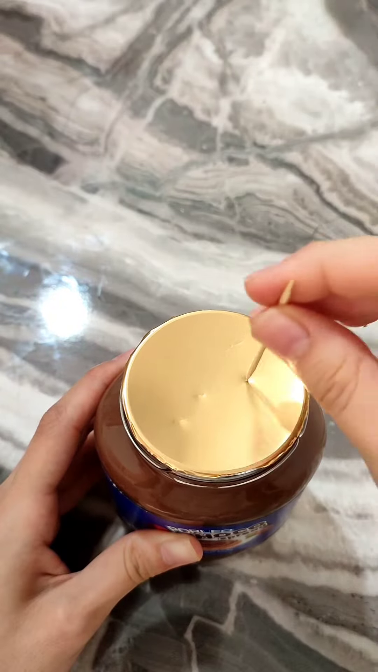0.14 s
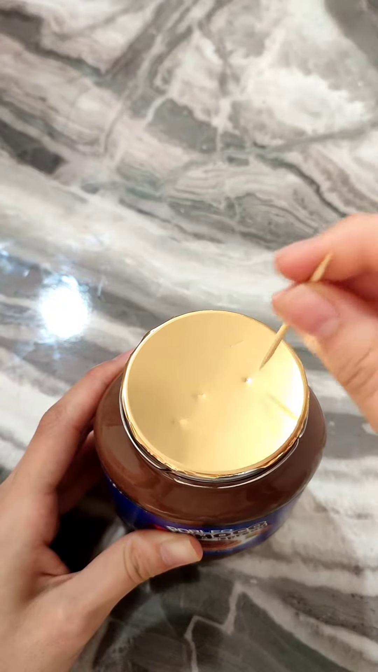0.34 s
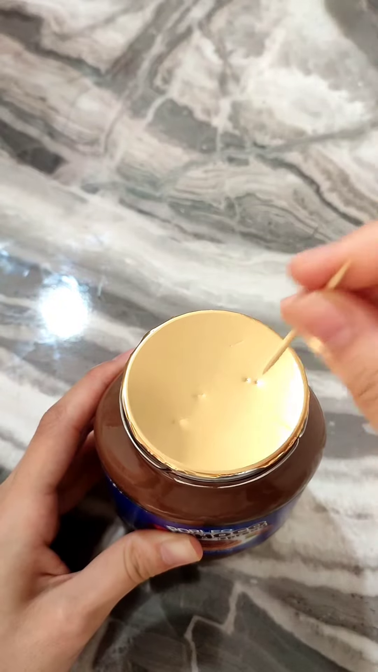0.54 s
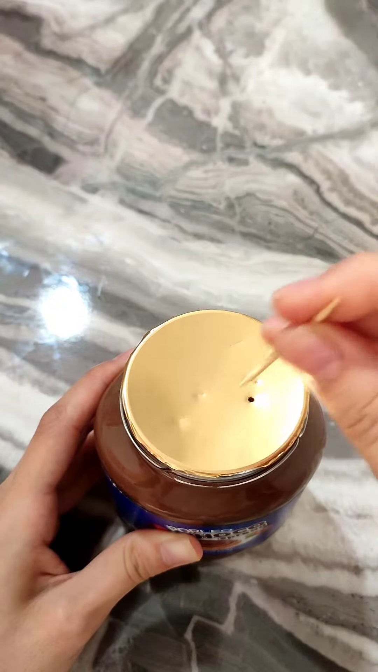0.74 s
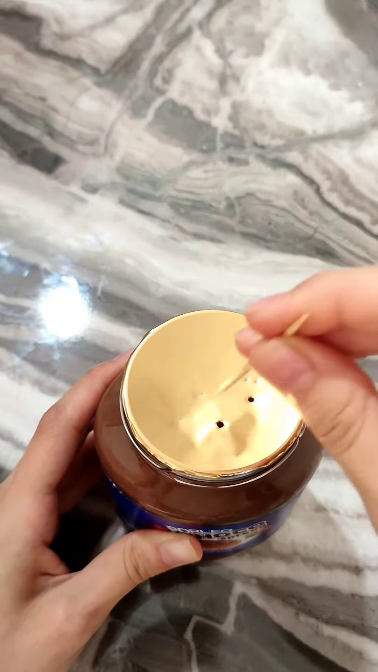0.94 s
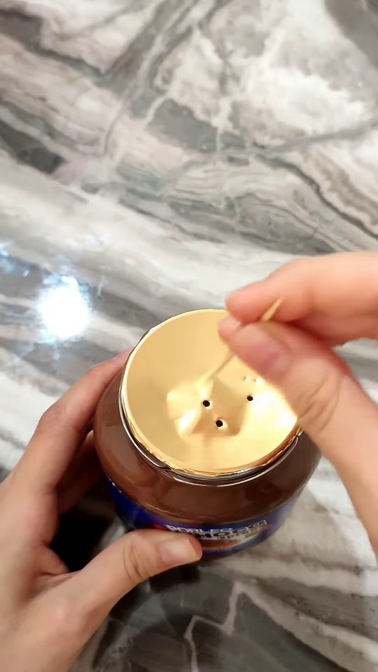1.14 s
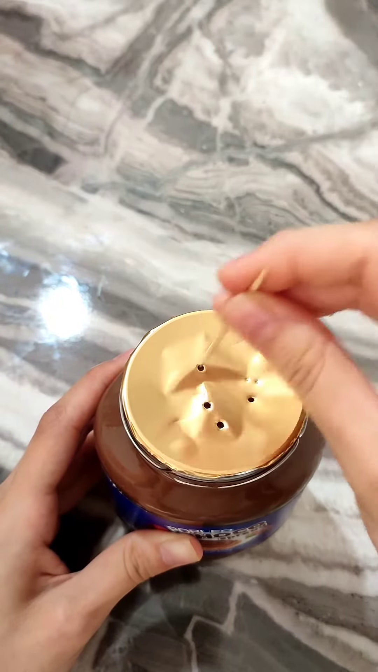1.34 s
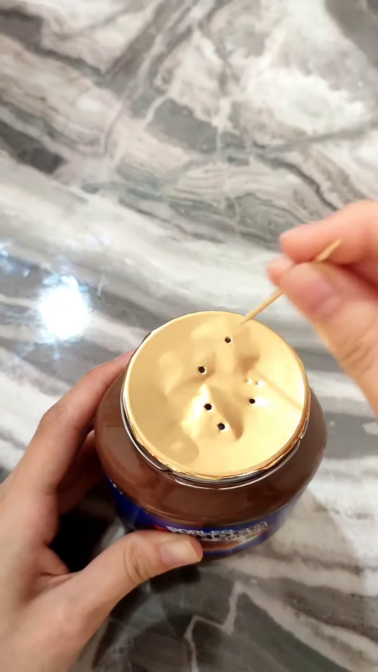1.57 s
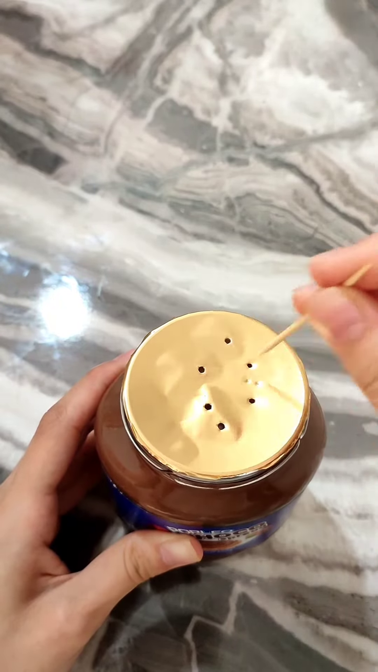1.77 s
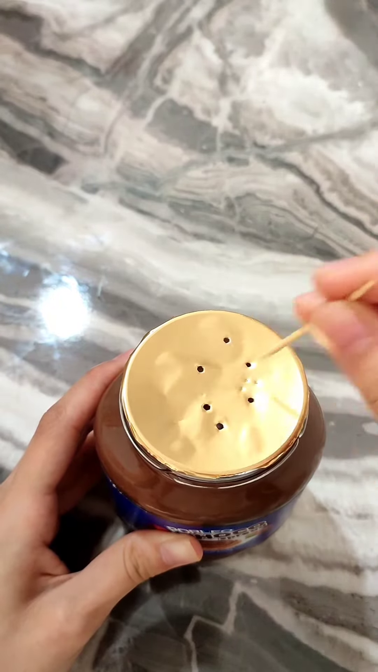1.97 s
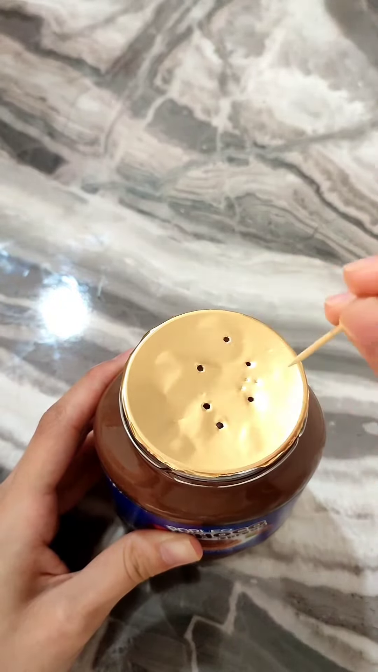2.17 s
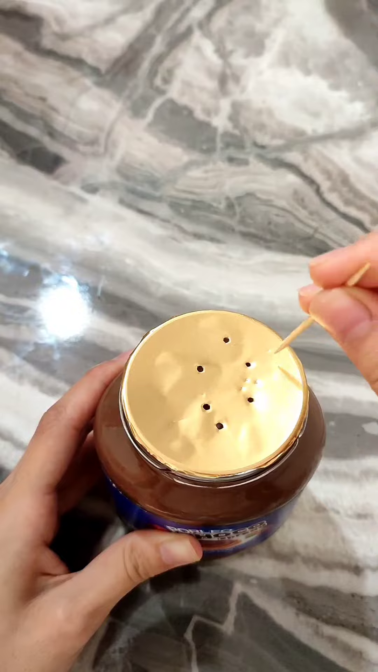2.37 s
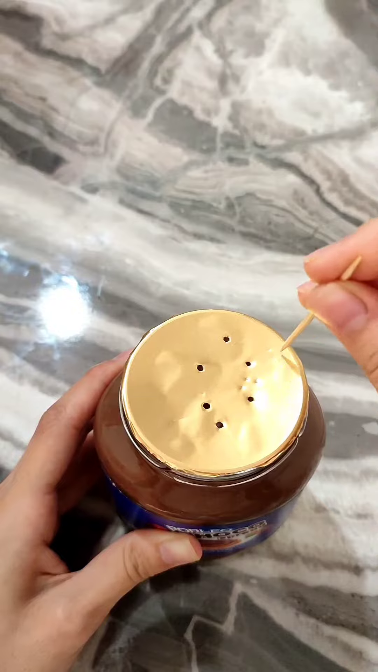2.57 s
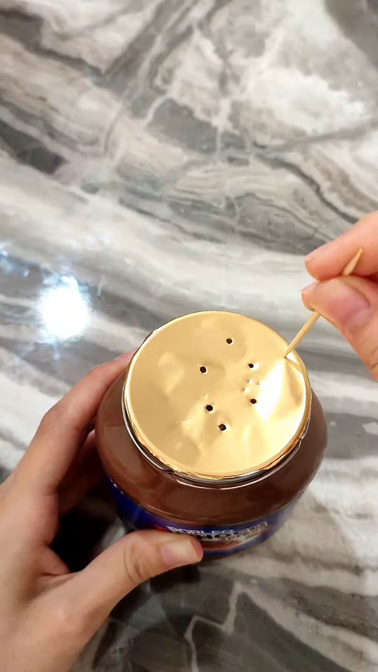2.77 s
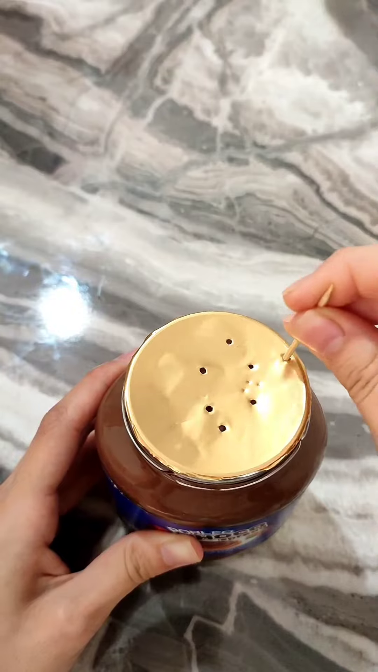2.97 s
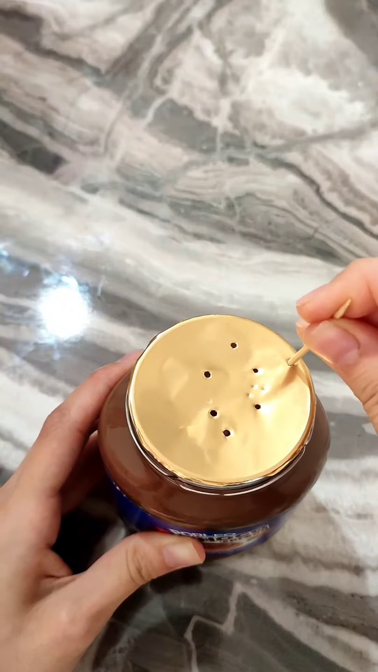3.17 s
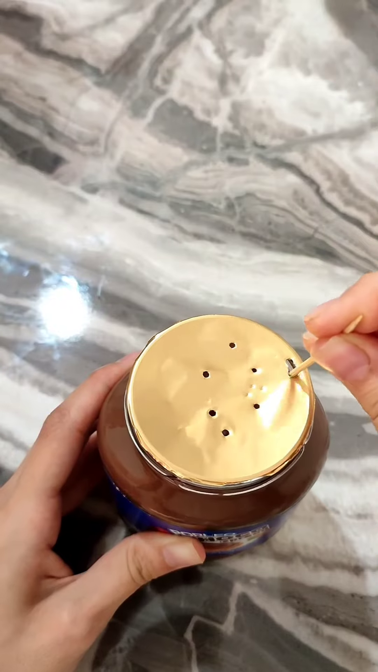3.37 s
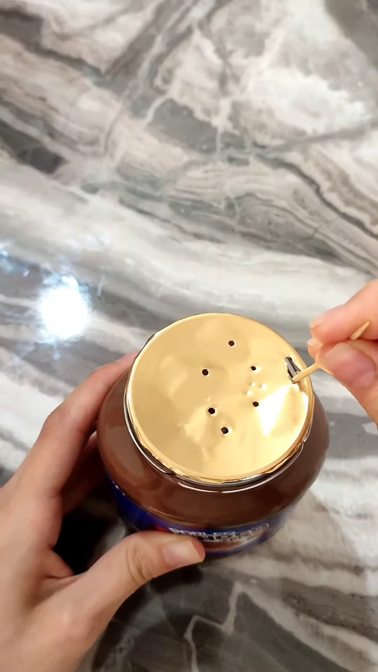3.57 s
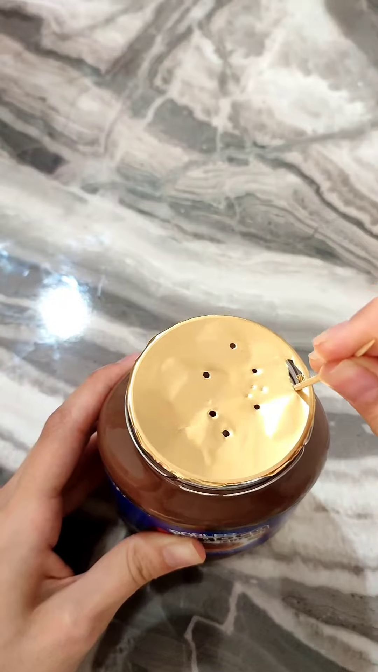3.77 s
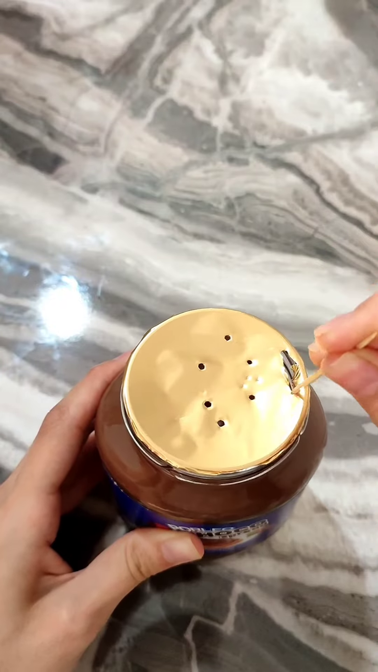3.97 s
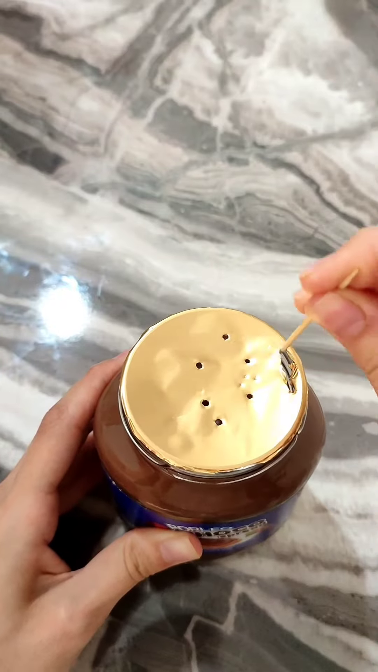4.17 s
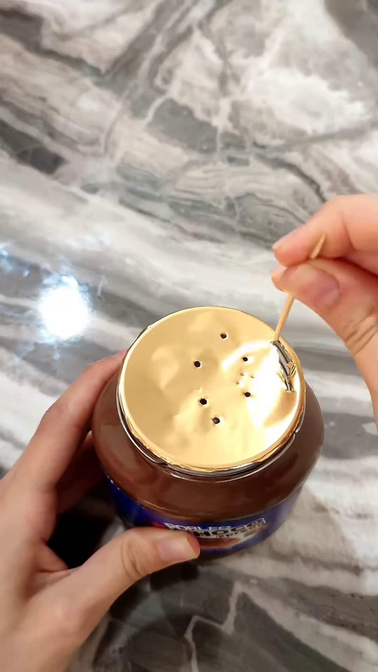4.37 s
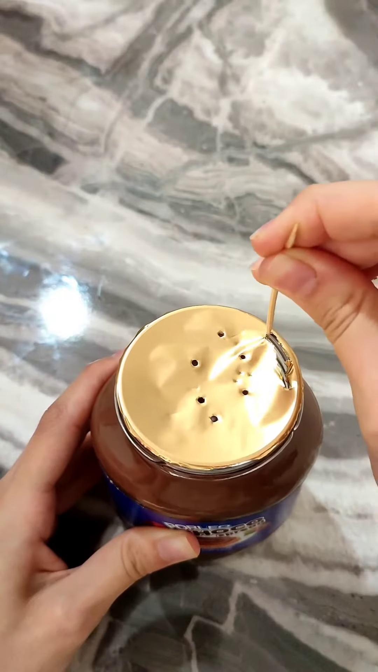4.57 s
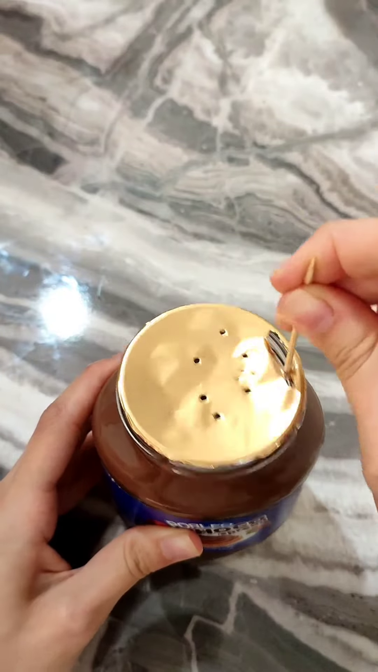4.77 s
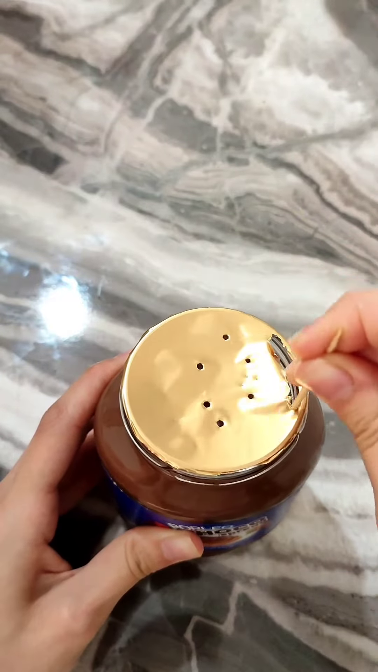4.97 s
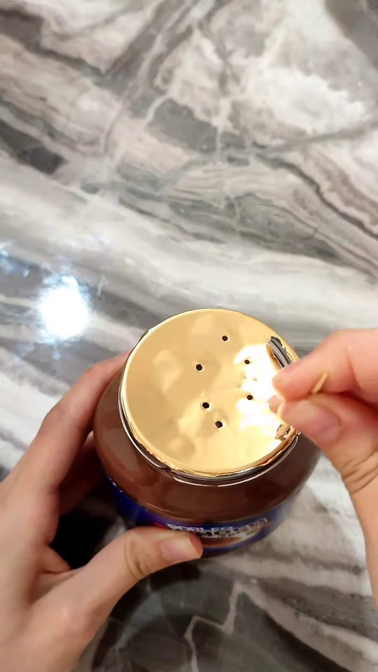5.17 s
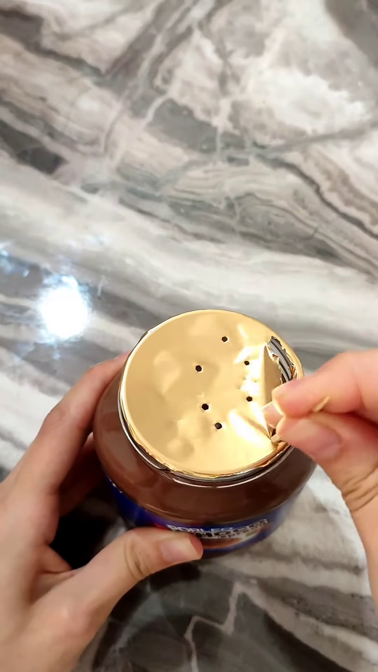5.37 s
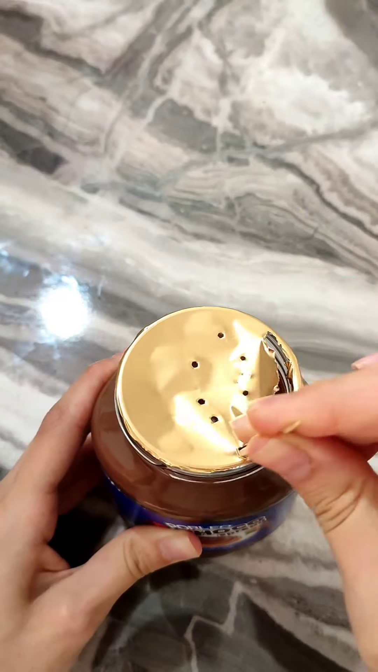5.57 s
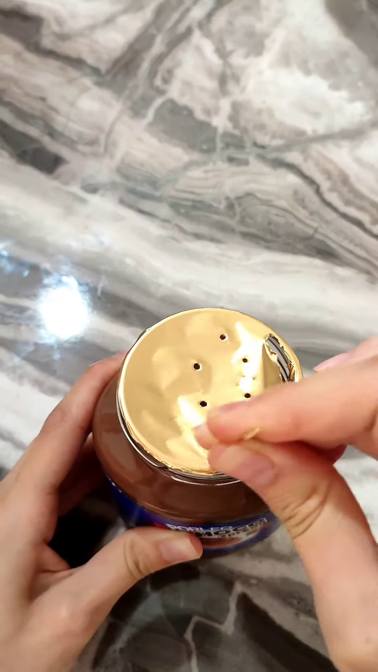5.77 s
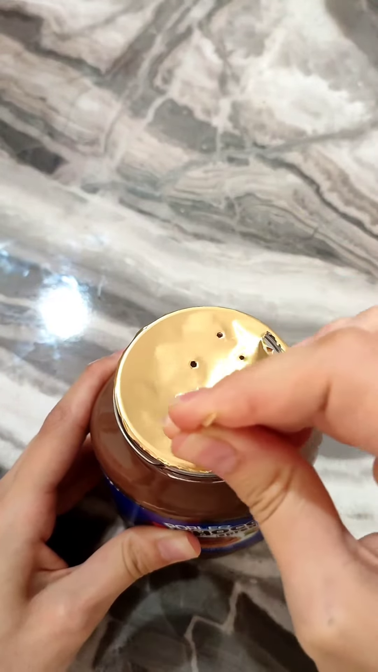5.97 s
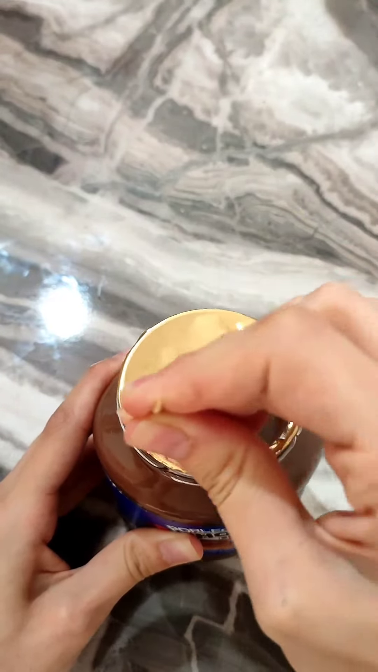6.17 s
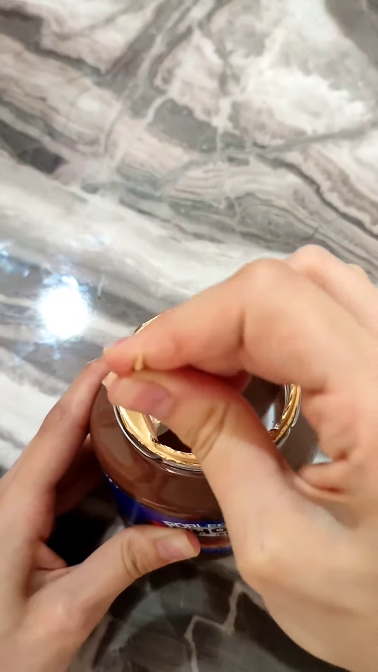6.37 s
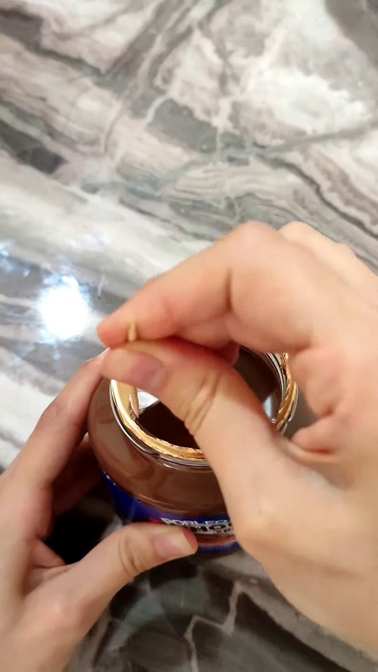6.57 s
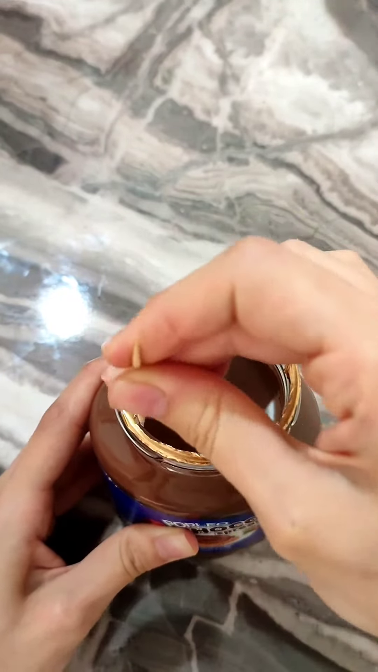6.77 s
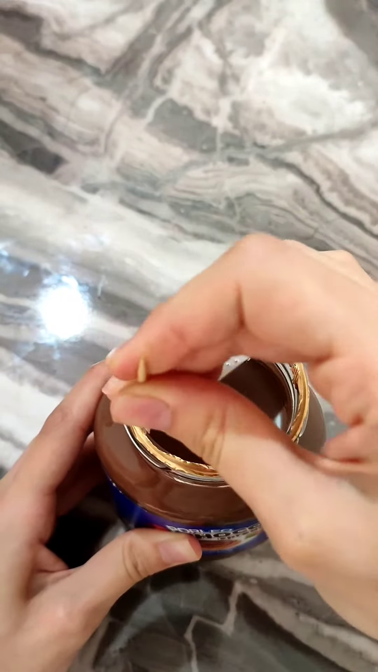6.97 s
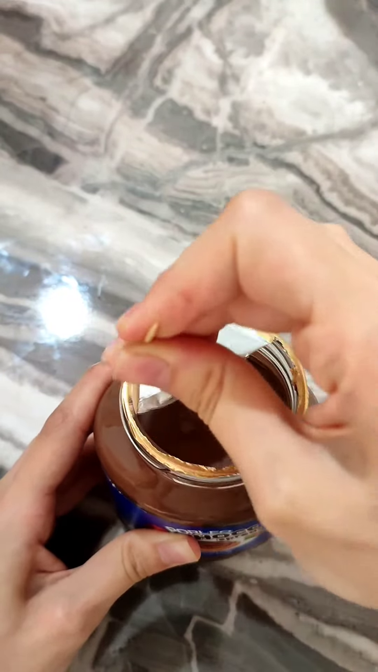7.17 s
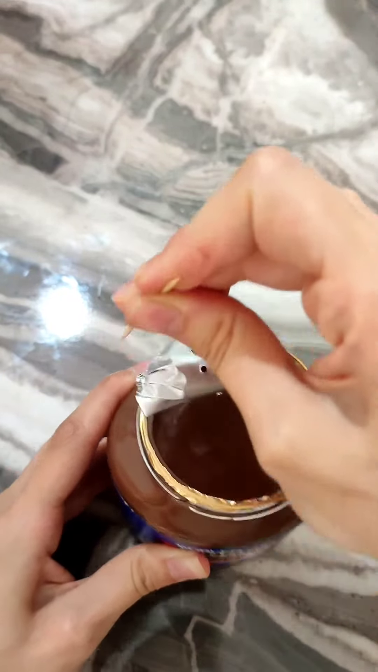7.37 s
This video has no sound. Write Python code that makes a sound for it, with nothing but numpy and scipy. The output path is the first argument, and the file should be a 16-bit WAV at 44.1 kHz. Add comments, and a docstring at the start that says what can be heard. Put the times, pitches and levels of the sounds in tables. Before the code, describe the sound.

A toothpick pricks the taut foil seal of a glass jar with dry, high ticks from about 0.2 seconds, the sharpest near 0.7. From 0.9 to 2 seconds it punches through in a quick run of crisp pops, roughly five a second, each with a brief hollow ring and a small thump like a drum skin. After a short pause, from 2.7 seconds the pick tears along the rim with lighter, irregular clicks, short rasps and faint crinkling. From about 4.2 seconds the snaps grow louder and crowd together as the slack foil peels back, strongest just after 6 seconds, while their hollow tone drifts slightly upward. The crackling thins around 6.6 to 7.1 seconds, then a last cluster of snaps and crinkles comes at 7.2 to 7.4. Everything is heard close up in a small, quiet kitchen with short reflections and very faint hiss.

```python
"""In a small, hard, quiet kitchen a toothpick pricks the taut foil seal of a glass jar: dry, high ticks.
From 0.85 s it punches through. Each snap cracks the foil, rings the air trapped under it and thumps
the seal like a drum skin. After a pause, from 2.7 s, the pick tears along the rim and peels the slack
seal back with snaps, rasps and faint crinkling, while the air's ring drifts upward in pitch.
Two spaced microphone ports hear the jar and the room's answer from close by."""
import sys
import numpy as np
from scipy import signal
from scipy.fft import rfft, irfft, next_fast_len
from scipy.io import wavfile
from scipy.ndimage import uniform_filter1d

SR = 44100
rng = np.random.default_rng(int(sys.argv[2]) if len(sys.argv) > 2 else 0)


def generate_wav(sig):
    """Save sig (samples, or channels by samples) to the path in sys.argv[1] as 16-bit PCM at SR."""
    pcm = np.round(np.clip(np.atleast_2d(sig).T, -1, 1) * 32767).astype(np.int16)
    wavfile.write(sys.argv[1], SR, pcm)


N = 328104

# Resonances of the foil. Each row: frequency in Hz, bandwidth in Hz, relative gain in dB.
FOIL_MODES = [(2135, 560, -3.5), (2870, 320, 1), (3340, 960, -5.5), (4810, 520, -2), (5480, 1190, -6),
              (7270, 1450, -3), (8210, 1380, -4), (11000, 2900, -9)]


def amp(db):
    return 10 ** (np.asarray(db) / 20)


def unit_rms(x):
    return x / np.sqrt(np.mean(x ** 2) + 1e-20)


def unit_peak(rows):
    return rows / np.abs(rows).max(axis=-1, keepdims=True)


def along(points, hz):
    """Interpolate (Hz, value) points on a logarithmic frequency axis."""
    f, values = np.transpose(points)
    return np.interp(np.log(hz + 1), np.log(f + 1), values)


def filtered(x, response):
    """Linear filtering: the spectrum of x is multiplied by a frequency response."""
    n = x.shape[-1]
    padded = next_fast_len(n + 8192)
    return irfft(rfft(x, padded) * response(np.fft.rfftfreq(padded, 1 / SR)), padded)[..., :n]


def resonance(f, hz, width):
    """Frequency response of a damped oscillator."""
    return 1j * f * width / (hz * hz - f * f + 1j * f * width)


def body(modes):
    """Modal superposition: parallel resonances add with alternating sign."""
    return lambda f: sum((-1) ** k * amp(db) * resonance(f, hz, width)
                         for k, (hz, width, db) in enumerate(modes))


def lay(times, rows):
    """Superposition: each row joins one track at its start time."""
    at = np.round(times * SR).astype(int)[:, None] + np.arange(rows.shape[-1])
    return np.bincount(at.ravel(), rows.ravel(), N + rows.shape[-1])[:N]


def noise_pair(shape, correlation):
    """Partial coherence: the two ports face different parts of the foil."""
    common, opposed = rng.standard_normal((2, *shape))
    angle = np.arccos(np.clip(correlation, 0, 1)) / 2
    mid, side = np.cos(angle) * common, np.sin(angle) * opposed
    return np.array([mid + side, mid - side])


def steady_noise(spectrum):
    """Steady noise at spaced ports is more coherent at long wavelengths."""
    # Likeness of left and right. Each row: frequency in Hz, correlation.
    coherence = [(60, 0.27), (240, 1), (950, 0.093), (3770, -0.044), (15000, -0.1)]

    def response(hz):
        angle = np.arccos(np.clip(along(coherence, hz), -1, 1)) / 2
        return amp(along(spectrum, hz)) * [np.cos(angle), np.sin(angle)]
    mid, side = filtered(rng.standard_normal((2, N)), response)
    return unit_rms(np.array([mid + side, mid - side]))


def hush():
    """The noise floor: independent steady noises add in power."""
    # Room and microphone noise. Each row: frequency in Hz, relative spectral density in dB.
    hiss = [(150, -40), (250, -28.5), (409, -35), (445, -23.5), (511, -35.5), (713, -27.5), (889, -40.5),
            (1020, -27.5), (1350, -38), (2160, -32.5), (5000, -38.5), (9110, -44), (13800, -37.5),
            (15000, -75)]
    # Rumble of the building, with the same columns.
    rumble = [(12, -25), (20, 0), (35, -7), (50, -7), (100, -18), (180, -21), (300, -50)]
    return amp(-76) * steady_noise(hiss) + amp(-72) * steady_noise(rumble)


def rip(scale_s):
    """Transient excitation: the force of a rip swells, peaks at 1.2 time scales and dies away."""
    age = np.arange(SR // 10) / SR / np.clip(scale_s, .0004, .05)
    return age ** 1.8 * np.exp(-1.5 * age)


def pricks():
    """Impulse response of the closed seal: high modes, a dry tick and a dull bump, but no air ring."""
    # Each row: start in seconds, peak level in dB, drum level in dB, rip time scale in seconds,
    # ring over tick in dB.
    taps = [(0.218, -34, -62, 0.0014, -3), (0.287, -55, -75, 0.0023, 0), (0.452, -41, -71.5, 0.0019, 2.5),
            (0.51, -50, -77, 0.0031, 3.5), (0.659, -35, -68.5, 0.0037, 7), (0.6659, -16, -61, 0.0019, 8),
            (0.681, -24.5, -67, 0.0018, 2.5), (0.715, -39, -72, 0.011, 7),
            (0.7413, -35.5, -64.5, 0.0043, 3.5)]
    # Modes of the unbroken seal. Each row: frequency in Hz, bandwidth in Hz, relative gain in dB.
    taut_modes = [(5710, 350, -4.5), (7220, 290, 0.5), (8450, 430, -6.5), (9930, 970, -8.5),
                  (12270, 3500, -16.5)]
    start, db, drum_db, rip_s, ring_db = np.transpose(taps)[:, :, None]
    noise = noise_pair((len(start), SR // 10), correlation=0.91)
    ring = filtered(rip(rip_s) * noise, lambda f: body(taut_modes)(f) * resonance(f, 9800, 12100))
    tick = filtered(rip(0.42 * rip_s) * noise,
                    lambda f: resonance(f, 8000, 8200) * resonance(f, 7100, 17000))
    treble = amp(db) * unit_peak(amp(ring_db) * unit_peak(ring) + unit_peak(tick))
    return np.array([lay(start[:, 0], amp(drum_db) * drum(start) + side) for side in treble])


def drum(start):
    """Membrane vibration: low modes decay after each push; a torn, slack seal loses the deepest."""
    # Each row: mean frequency in Hz, relative level in dB, time to fall 60 dB in seconds.
    membrane_modes = [(150, -3, .08), (220, -2, .07), (290, 0, .06), (390, 0, .05), (520, -3, .04)]
    torn_s, attack_s = 2.7, .002
    t = np.arange(SR // 10) / SR
    shape = (len(start), len(membrane_modes))
    strength = amp(rng.normal(0, 3, shape))
    detune = 1 + .12 * rng.standard_normal(shape)
    swing = sum(strength[:, [k]] * amp(db - 60 * t / t60) * np.sin(2 * np.pi * hz * detune[:, [k]] * t)
                for k, (hz, db, t60) in enumerate(membrane_modes))
    swing *= 1 - np.exp(-t / attack_s)
    low_cut_hz = np.where(start < torn_s, 120, 300)
    return unit_peak(filtered(swing, lambda f: (1j * f / (low_cut_hz + 1j * f)) ** 4))


def grit(shape):
    """Stick-slip friction: dense micro-rips of very uneven size come in clumps of a few milliseconds."""
    clumps = unit_rms(uniform_filter1d(rng.standard_normal(shape), size=120, axis=-1))
    slips = unit_rms(uniform_filter1d(rng.standard_normal(shape), size=900, axis=-1))
    return amp(2.5 * clumps + 2.95 * slips + 2.47 * rng.exponential(size=shape))


def trapped_air(hz):
    """Cavity resonance: the air under the seal has one steep-sided, quickly damped peak."""
    return lambda f: resonance(f, hz, 189) * resonance(f, hz, 1800) ** 2


def crinkling():
    """Forced resonance: micro-rips drive the foil and the air, whose pitch follows the opening's size."""
    # Two spells of working the foil. Each row of a spell: time in seconds, air ring level in dB.
    spells = [
        [(0.85, -77), (1.3, -69), (1.7, -68), (2.15, -76)],
        [(2.7, -82), (3.0, -69.5), (3.4, -69.5), (3.85, -85), (4.2, -66.5), (4.6, -78), (5.0, -68), (5.3, -70),
         (5.7, -77), (6.1, -72), (6.35, -75), (6.6, -78), (6.8, -71.5), (7.1, -82.5), (7.44, -54)],
    ]
    # Pitch of the air under the seal. Each row: time in seconds, frequency in Hz.
    air_pitch = [(0.85, 1300), (2.15, 1442), (3.8, 1363), (5.0, 1480), (6.0, 1557), (7.44, 1660)]
    times, ring_db = np.concatenate(spells).T
    t = np.arange(N) / SR
    working = sum((t > spell[0][0]) & (t < spell[-1][0]) for spell in spells)
    force = grit(N)
    hz, frame_s, spectra = signal.stft(force * rng.standard_normal(N), SR, nperseg=512)
    ring_hz = np.interp(frame_s, *np.transpose(air_pitch))
    ring = signal.istft(spectra * trapped_air(ring_hz)(hz[:, None]), SR, nperseg=512)[1][:N]
    crackle = filtered(force * noise_pair((N,), correlation=0.29), body(FOIL_MODES))
    return working * amp(np.interp(t, times, ring_db)) * (unit_rms(ring) + amp(-5.5) * unit_rms(crackle))


def creased_foil(count):
    """Modal scatter: each crease excites the foil's modes at new strengths and slightly new pitches."""
    shape = (count, len(FOIL_MODES))
    scatter_db = rng.normal(0, 2.5, shape)
    detune = 1 + .04 * rng.standard_normal(shape)
    return body([(hz * detune[:, [k]], width, db + scatter_db[:, [k]])
                 for k, (hz, width, db) in enumerate(FOIL_MODES)])


def snaps():
    """Impulsive excitation: a rip of a few milliseconds drives the air, the foil and the drum modes."""
    # Each row: start in seconds, air ring peak in dB, ring pitch in Hz, crack peak in dB.
    fractures = [(0.87, -27.5, 1136, -18), (0.963, -31.5, 1480, -55), (0.987, -34, 956, -32.5),
                 (0.998, -37, 1420, -39), (1.109, -29, 1370, -23), (1.122, -23, 1340, -27.5),
                 (1.21, -27, 1100, -29), (1.331, -19.5, 1420, -19), (1.389, -48, 1470, -36.5),
                 (1.405, -22, 1430, -54), (1.413, -25, 1000, -33), (1.543, -25, 1414, -20.5),
                 (1.608, -27.5, 1243, -25.5), (1.758, -27, 1600, -22), (1.763, -29, 1210, -26.5),
                 (1.812, -43, 990, -24), (1.818, -21.5, 1336, -21), (1.973, -28, 1380, -19.5),
                 (2.008, -31.5, 1434, -48), (2.717, -39, 1310, -49), (2.735, -31.5, 1420, -40),
                 (2.861, -34, 1380, -31.5), (2.902, -45, 1550, -51), (2.935, -34, 1430, -40),
                 (3.054, -38.5, 1570, -33), (3.127, -41.5, 1470, -54), (3.379, -40.5, 1360, -37.5),
                 (3.401, -38, 1540, -48), (3.411, -39.5, 1390, -31), (3.44, -34, 1360, -37.5),
                 (3.529, -43.5, 1340, -36), (3.627, -36, 1400, -47), (3.639, -39, 1130, -39),
                 (3.697, -45, 1340, -32), (3.886, -44, 1410, -51), (3.925, -39, 1300, -32.5),
                 (3.934, -42, 1290, -36), (3.905, -47, 1210, -46), (4.063, -48, 1400, -38.5),
                 (4.132, -43, 1320, -24), (4.238, -28, 1400, -28), (4.283, -38, 1420, -44),
                 (4.351, -34.5, 1300, -26.5), (4.378, -35.5, 1380, -51), (4.415, -31, 1260, -33),
                 (4.543, -25.5, 1440, -30), (4.719, -34, 1430, -57), (4.742, -30, 1430, -37.5),
                 (4.816, -26, 1420, -33), (4.836, -38, 1270, -37), (4.886, -38.5, 1380, -42),
                 (4.908, -41, 1350, -36), (4.993, -31.5, 1340, -32), (5.007, -38, 1240, -42),
                 (5.045, -38.5, 1240, -48), (5.055, -36.5, 1440, -43), (5.128, -39, 1420, -50),
                 (5.182, -41, 1440, -33.5), (5.197, -25.5, 1530, -38), (5.219, -30, 1490, -38.5),
                 (5.262, -32, 1490, -35), (5.395, -37.5, 1430, -41), (5.405, -25.5, 1510, -27.5),
                 (5.442, -40, 1760, -58), (5.48, -28.5, 1480, -23), (5.496, -26.5, 1360, -36.5),
                 (5.522, -29, 1680, -58), (5.528, -27.5, 1630, -27.5), (5.561, -39.5, 1360, -67),
                 (5.728, -36.5, 1340, -37), (5.751, -26, 1470, -27), (5.792, -33, 1460, -32),
                 (5.817, -28.5, 1535, -33), (5.84, -33, 1480, -36), (5.968, -26, 1576, -29),
                 (6.074, -18.5, 1535, -29), (6.127, -33, 1620, -37), (6.134, -22, 1486, -40),
                 (6.17, -22, 1534, -27.5), (6.331, -44, 1380, -31.5), (6.344, -38.5, 1600, -29),
                 (6.498, -45, 1480, -43), (6.513, -40, 1500, -36), (6.523, -25.5, 1606, -32),
                 (6.714, -55.5, 1570, -56), (6.887, -39.5, 1620, -46), (7.02, -44, 1700, -67),
                 (7.209, -40.5, 1750, -58.5), (7.223, -30.5, 1810, -41), (7.263, -34, 1510, -30.5),
                 (7.382, -26, 1480, -28), (7.392, -41, 1410, -26), (7.414, -37, 1510, -23)]
    start, ring_db, ring_hz, crack_db = np.transpose(fractures)[:, :, None]
    scatter = rng.standard_normal((len(start), 2))
    rip_s = 0.0023 * np.exp(0.13 * scatter[:, :1])
    crack_hz = 4640 * np.exp(0.42 * scatter[:, 1:])
    shape = (len(start), SR // 10)
    ring = filtered(rip(rip_s) * rng.standard_normal(shape), trapped_air(ring_hz))
    # the crack is one sharp break, 1 ms into the longer rip
    sharp_break = amp(-7) * np.roll(rip(.12 * rip_s), shift=SR // 1000, axis=1)
    force = (rip(rip_s) + sharp_break) * noise_pair(shape, correlation=0.47)
    foil = creased_foil(len(start))
    crack = filtered(force, lambda f: foil(f) * (.9 + resonance(f, crack_hz, .45 * crack_hz)))
    knock = amp(-53 + 0.31 * ring_db) * drum(start)  # grows more slowly than the ring
    low = amp(ring_db) * unit_peak(ring) + knock
    return np.array([lay(start[:, 0] - .001, low + amp(crack_db) * unit_peak(side)) for side in crack])


def thumps():
    """Free vibration: a hard push, as when the pick breaks through, sets the whole seal swinging."""
    # Each row: start in seconds, drum level in dB.
    pushes = [(0.872, -38), (1.108, -41.5), (1.192, -54), (1.332, -46), (1.403, -45), (1.543, -46.5),
              (1.608, -50), (1.758, -44), (1.975, -52), (4.776, -52), (4.935, -56.5)]
    start, db = np.transpose(pushes)[:, :, None]
    return lay(start[:, 0], amp(db) * drum(start))


def scrapes():
    """Friction noise: the pick drags through a hole or along the rim with a hollow, weakening rasp."""
    # Each row: start in seconds, length in seconds, air ring in dB, ring pitch in Hz, crackle in dB.
    drags = [(0.878, 0.03, -46, 1190, -37.5), (0.939, 0.047, -42.5, 1170, -43.5),
             (1.136, 0.044, -51, 1310, -44.5), (1.183, 0.024, -39, 1110, -47.5),
             (1.395, 0.035, -45.5, 1280, -38), (1.551, 0.029, -47, 1480, -44),
             (1.845, 0.085, -69, 1300, -64), (2.87, 0.12, -47, 1420, -47.5),
             (3.067, 0.12, -49.5, 1390, -61), (3.44, 0.023, -59, 1400, -71),
             (3.864, 0.073, -59.5, 1360, -65), (4.772, 0.059, -49, 1340, -55.5),
             (4.817, 0.085, -54, 1410, -54), (5.059, 0.092, -58, 1390, -70),
             (5.176, 0.029, -42.5, 1410, -46), (5.489, 0.051, -51, 1520, -42),
             (5.536, 0.09, -57, 1520, -67), (6.059, 0.0065, -40, 1600, -42),
             (6.13, 0.0076, -39, 1540, -37.5), (6.167, 0.04, -58, 1470, -45),
             (6.534, 0.065, -64, 1540, -55), (6.647, 0.045, -62.5, 1700, -72),
             (6.77, 0.14, -65.5, 1650, -73.5), (6.985, 0.055, -62, 1550, -68),
             (7.196, 0.1, -56.5, 1880, -50), (7.38, 0.075, -43, 1510, -49.5)]
    grip_s, release_s, fade_db_per_s = 0.006, 0.0068, 57
    start, length, ring_db, ring_hz, crackle_db = np.transpose(drags)[:, :, None]
    t = np.arange(SR // 3) / SR
    contact = np.clip(t / grip_s, 0, 1) * np.clip((length - t) / release_s + 1, 0, 1)
    envelope = contact * amp(-fade_db_per_s * t)
    stroke = lambda rows, db: amp(db) * envelope * rows / np.std(rows, axis=-1, keepdims=True)
    force = grit((len(start), len(t)))
    ring = filtered(force * rng.standard_normal(force.shape),
                    lambda f: trapped_air(ring_hz)(f) + 0.09 * resonance(f, 606, 530))
    crackle = filtered(force * noise_pair(force.shape, correlation=0.187), creased_foil(len(start)))
    return np.array([lay(start[:, 0], stroke(ring, ring_db) + stroke(side, crackle_db))
                     for side in crackle])


def kitchen(direct):
    """Reverberation: each frequency dies at its own rate; the echo pattern shifts as the hands move."""
    # Each row: frequency in Hz, time to fall 60 dB in seconds.
    decay_times = [(200, 0.61), (600, 0.28), (1400, 0.21), (3700, 0.25), (10000, 0.19)]
    # The room's answer, weak in the bass. Each row: frequency in Hz, gain in dB.
    room_gain = [(200, -16.5), (600, 0.5), (1400, -11.5), (4000, -3.5), (12000, -5)]
    echoes = np.zeros((2, N + SR))
    block, delay = SR // 4, 180  # samples
    for start in range(0, N, block):
        hz, t, spectra = signal.stft(rng.standard_normal((2, SR // 3)), SR, nperseg=256)
        decay = amp(-60 * t / along(decay_times, hz)[:, None])
        tail = signal.istft(spectra * decay, SR, nperseg=256)[1]
        wet = signal.fftconvolve(direct[:, start:start + block], tail / np.linalg.norm(tail[0]), axes=1)
        echoes[:, start + delay:start + delay + wet.shape[1]] += wet
    return filtered(echoes[:, :N], lambda hz: amp(along(room_gain, hz)))


def spaced_ports(hz):
    """Time and level differences between the ports: the left one hears the jar first."""
    # Each row: frequency in Hz, left minus right level in dB.
    balance = [(200, -1), (550, 1), (1400, -3), (2800, 0), (5500, -2), (10000, 0), (14000, -3)]
    # Each row: frequency in Hz, lead of the left port in seconds.
    lead = [(300, 0.00012), (1400, 0.00016), (3000, 0.000206)]
    return [amp(side * along(balance, hz) / 2) * np.exp(1j * np.pi * side * hz * along(lead, hz))
            for side in (1, -1)]


def scene():
    """Direct and reverberant sound add at the two ports, over the noise floor."""
    direct = pricks() + snaps() + thumps() + scrapes() + crinkling()
    return filtered(direct + kitchen(direct), spaced_ports) + hush()


def record(dry):
    """Frequency response of the microphone: lifted bass slopes down to the treble and a band limit."""
    # Each row: frequency in Hz, gain in dB.
    mic_gain = [(100, 16), (13500, -1), (14300, 4.5), (14800, -25.5), (15600, -47.5)]
    limit_hz = 15665
    return filtered(dry, lambda hz: amp(along(mic_gain, hz)) * (hz < limit_hz))


dry = scene()
out = record(dry)
generate_wav(out)
```